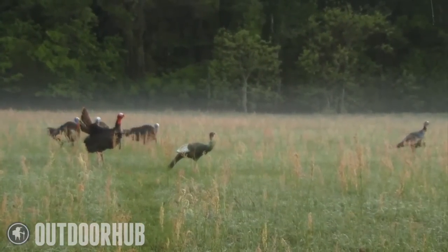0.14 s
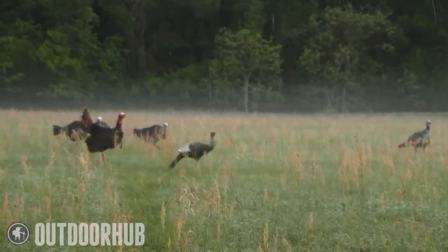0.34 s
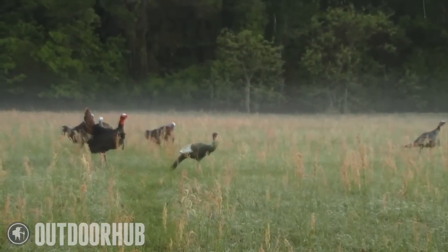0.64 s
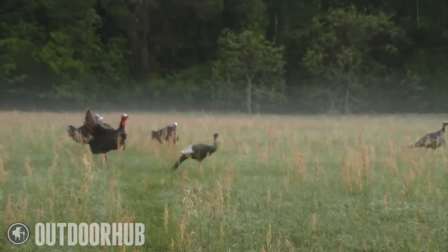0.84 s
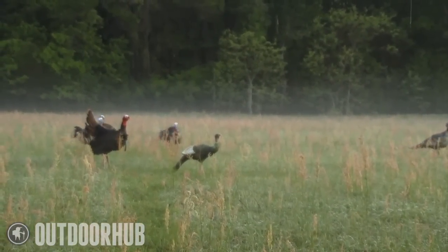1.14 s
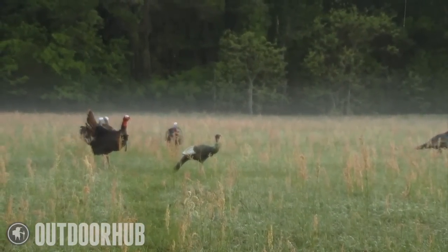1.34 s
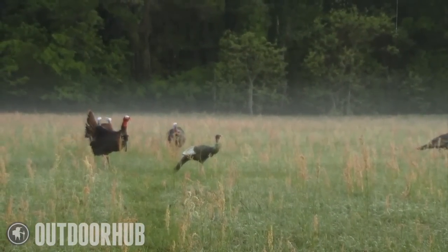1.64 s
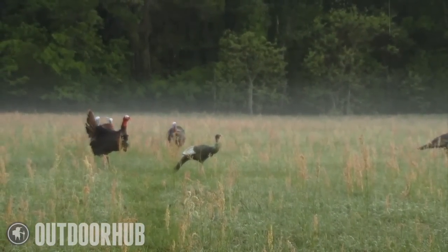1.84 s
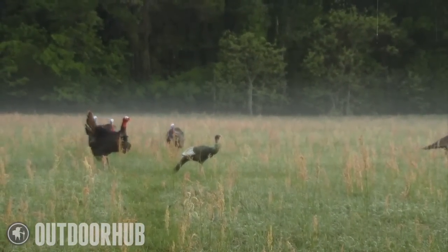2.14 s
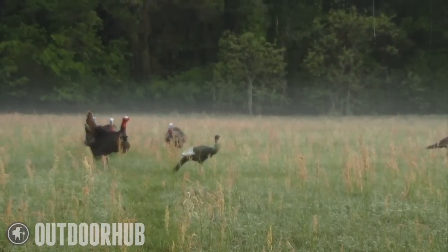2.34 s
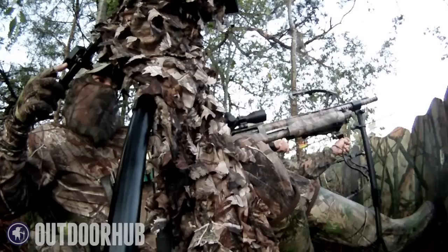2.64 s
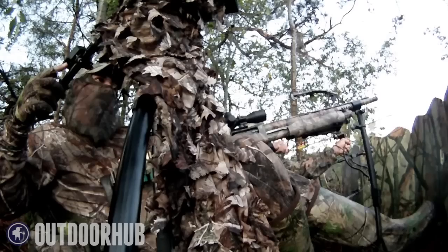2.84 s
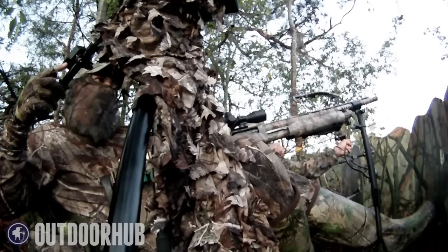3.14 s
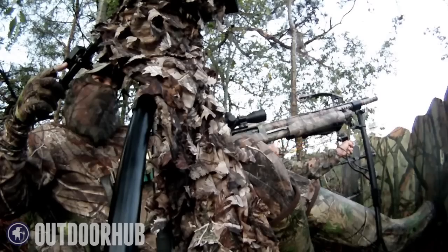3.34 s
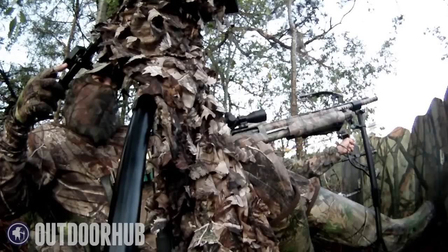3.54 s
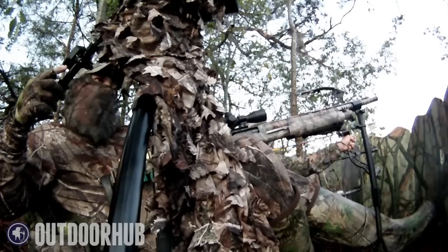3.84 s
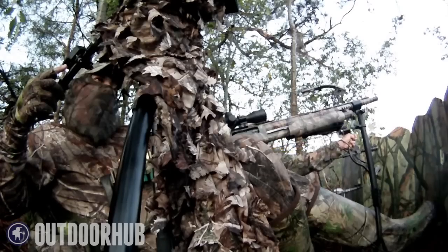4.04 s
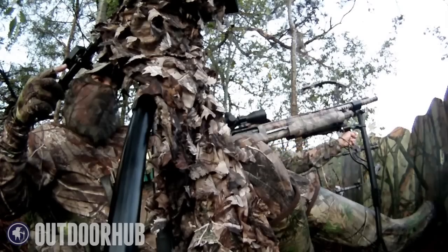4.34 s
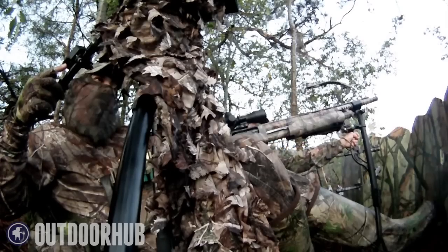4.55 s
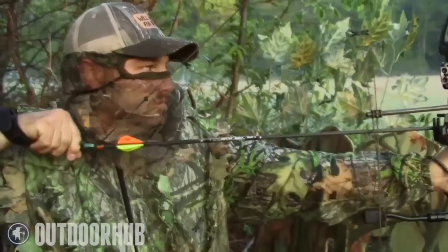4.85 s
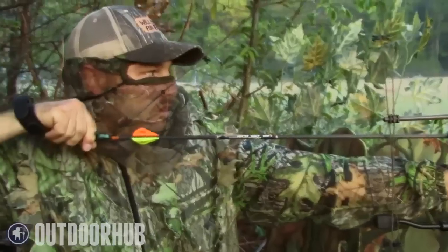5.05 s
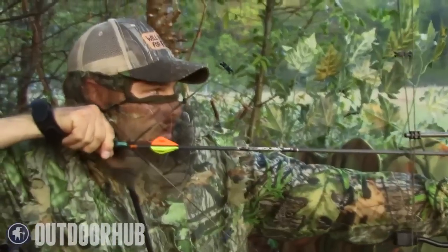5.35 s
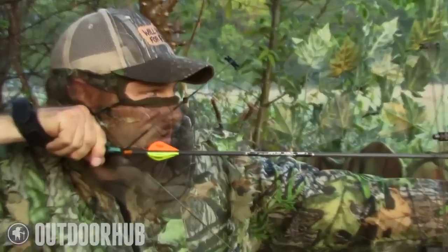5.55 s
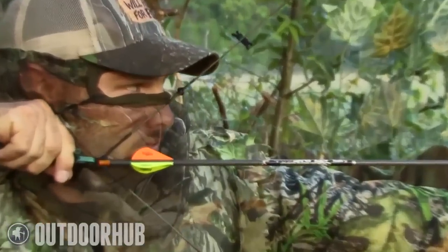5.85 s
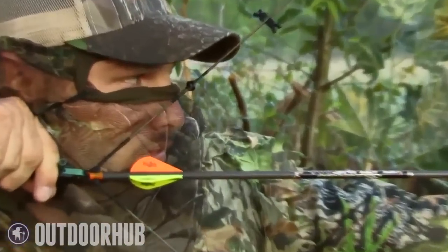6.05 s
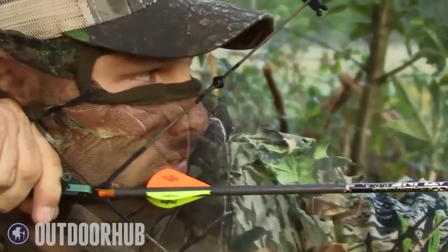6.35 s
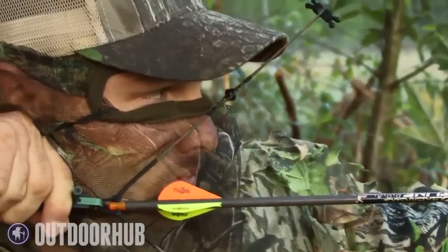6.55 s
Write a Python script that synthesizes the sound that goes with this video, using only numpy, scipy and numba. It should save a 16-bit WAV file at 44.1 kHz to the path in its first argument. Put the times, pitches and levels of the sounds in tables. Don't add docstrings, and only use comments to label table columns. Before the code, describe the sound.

A nearby hen turkey yelps about four times a second, from a soft first call to loud raspy ones, then the same row comes again. After it stops, a quiet meadow remains: soft air, a faint low motor hum, thin bird whistles and chips, a few small knocks, and finally a distant throbbing gobble with a low drone. Close, dry outdoor pickup with faint tree echo.

```python
import sys
import numpy as np
from scipy import signal
from scipy.fft import rfft, irfft
from scipy.io import wavfile
from scipy.ndimage import uniform_filter1d
from numba import njit

SR = 44100
rng = np.random.default_rng(int(sys.argv[2]) if len(sys.argv) > 2 else 0)


def volts_from_decibels(level):
    exponent = np.asarray(level, float) / 20
    return 10 ** exponent


def pcm_store(signal):
    levels = np.round(np.clip(np.atleast_2d(signal), -1, 1) * 32767)
    wavfile.write(sys.argv[1], SR, levels.astype(np.int16).T)


N = 294676
T = np.arange(N) / SR


def unit(x):
    return x / np.sqrt(np.mean(x ** 2))


def curves(rows):
    s, *columns = np.transpose(rows)
    return [np.interp(T, s, c) for c in columns]


def filtered(x, order, hz, kind="low"):
    return signal.sosfilt(signal.butter(order, hz, kind, fs=SR, output="sos"), x)


@njit
def svf(x, hz, width):
    y, band_state, low_state = np.empty(len(x)), 0., 0.
    for i in range(len(x)):
        g, k = np.tan(np.pi * hz[i] / SR), width / hz[i]
        v = (band_state + g * (x[i] - low_state)) / (1 + g * (g + k))
        band_state = 2 * v - band_state
        low_state += 2 * g * v
        y[i] = k * v
    return y


def band(x, hz, width):
    return svf(x + 1e-18, hz + np.zeros(N), 1. * width)


def walk(rate):
    k = int(SR / rate)
    held = np.repeat(rng.standard_normal(N // k + 1), k)
    return unit(uniform_filter1d(uniform_filter1d(held, k), k)[:N])


def tone(hz):
    return np.sin(2 * np.pi * np.cumsum(hz) / SR)


def hen():
    # start_s, length_s, level_db, rasp_pitch_hz, whine_pitch_hz
    yelps = [
        (0.127, .051, -38, 701.3, 850),
        (.362, .086, -26.5, 672.7, 813.7),
        (0.617, 0.083, -25, 685, 826.3),
        (0.871, 0.075, -26.5, 717, 826),
        (1.136, .074, -21.5, 726, 811),
        (1.397, 0.0671, -21.5, 751.8, 839.4),
        (1.741, 0.067, -44.5, 664.4, 699),
    ]
    # centre_hz, width_hz, level_db
    resonances = [(1013, 250, -5.5), (1228, 190, -1), (1590, 238, 3.5), (1986, 570, -8.5), (2790, 143, -6),
                  (3075, 62, -9.5), (3460, 183, -12), (4280, 400, -25.5)]
    flutter_hz = 227.7
    db, hz, root_db, rasp = curves(np.vstack([yelp(*y) for y in yelps]))
    sounding = sum((T > s) & (T < s + length) for s, length, *_ in yelps)
    rasp = np.clip(rasp, 0, 1)
    cycles = np.cumsum(hz * (1 + .06 * rasp * walk(450))) / SR
    flutter = np.cos(2 * np.pi * np.cumsum(flutter_hz * (1 + .45 * walk(110))) / SR)

    uneven = rng.uniform(-1, 1, N // 40)[np.round(cycles).astype(int)]
    size = (1 + .8 * rasp * uneven) * (1 + .6 * rasp * flutter)
    snaps = size * np.exp(6 * (np.cos(2 * np.pi * cycles) - 1))
    turbulence = unit(band(rng.standard_normal(N), 2700, 3000))
    stirred = snaps + .42 * (.3 + rasp) * (1 + .5 * flutter) * turbulence

    voice = sum((-1) ** k * volts_from_decibels(g) * band(band(stirred, f, w), f, 4 * w)
                for k, (f, w, g) in enumerate(resonances))
    voice = filtered(filtered(voice, 6, 960, "high"), 4, 4700)
    voice = voice / np.sqrt(uniform_filter1d(voice ** 2, int(.009 * SR)) + 1e-12)

    root = np.sqrt(2) * tone(hz * (1 + .035 * rasp * walk(150)))
    root = root * (1 + .35 * rasp * flutter) * volts_from_decibels(2.5 * rasp * walk(120))
    root = filtered(root, 4, 480, "high")
    root_level = volts_from_decibels(root_db) * np.clip((db + 60.5) / 12, 0, 1)

    breath = (3.9 + np.cos(2 * np.pi * cycles)) * rng.standard_normal(N)
    hiss = unit(band(band(breath, 8700, 4600), 9630, 4400))
    hiss = hiss + volts_from_decibels(-16.0) * unit(band(breath, 13200, 1500))
    hiss = hiss + volts_from_decibels(-11.0) * unit(band(breath, 5940, 300))
    return sounding * volts_from_decibels(db) * (voice + volts_from_decibels(-33.5) * rasp * hiss + root_level * root)


def yelp(s, length, db, hz, edge_hz):
    rasp = np.clip((db + 44) / 19, 0, 1)
    end = s + length
    whine, crack, close, release = np.minimum([.015, 0.01273, 0.01293, .016], .22 * length)
    root_db = -6.5 - 1.16 * max(db + 27, 0)
    sag_db = min(-300 * (length - 0.076), 3)
    crack_hz = edge_hz + 0.3575 * (hz - edge_hz)
    return np.transpose([[s, s + whine, s + whine + crack, end - release - close, end - release, end],
                         db + np.array([-36.5, -6.5, 0, sag_db, sag_db - 3, -44]),
                         [1.03 * edge_hz, crack_hz, hz, hz, edge_hz, 0.98 * edge_hz],
                         root_db + np.array([1, 1, 0, 0, 3.5, 3.5]),
                         rasp * np.array([.5, .5, .75, 1, .5, .5])])


def songbirds():
    out, warble = np.zeros(N), walk(250)
    for s, length, first_hz, last_hz, db, bend in notes():
        u = np.linspace(0, 1, int(length * SR))
        i = int(s * SR)
        hz = first_hz + (last_hz - first_hz) * u ** bend
        depth = .5 * abs(last_hz / first_hz - 1)
        hz = hz * (1 + depth * warble[max(i, 0):][:len(u)] / 10)
        note = volts_from_decibels(db - 1.5) * np.sin(np.pi * u) ** .5 * tone(hz)
        out[max(i, 0):i + len(u)] += note[max(-i, 0):]
    return out * volts_from_decibels(1.5 * walk(90))


def notes():
    # start_s within it, length_s, first_hz, last_hz, level_db
    phrase = [
        (0, .014, 3600, 5120, -56.5),
        (.007, 0.019, 5330, 5180, -47),
        (0.067, 0.01, 4280, 3280, -51.5),
        (0.304, .017, 3340, 3090, -56),
        (0.427, .04, 2270, 1753, -58.5),
        (0.471, .04, 1800, 2000, -60.5),
        (0.553, .037, 2820, 4565, -50),
        (0.601, .075, 5960, 2710, -55.5),
        (0.67, .06, 2730, 2740, -64),
    ]
    # start_s, stretch, louder_db
    sung = [
        (.022, 1.0, 0),
        (5.814, 1.016, 0),
    ]
    # start_s, length_s, level_db
    whistles = [
        (-.12, .215, -62.5),
        (1.829, 0.17, -70),
        (4.499, 0.049, -62),
        (4.723, .2, -61.5),
        (4.973, 0.17, -62.5),
    ]
    # start_s, length_s, first_hz, level_db
    chips = [(.197, 0.028, 4330, -68), (.33, .036, 4300, -75), (4.551, .025, 4370, -72),
             (4.683, .025, 4280, -68), (5.223, .021, 4350, -65), (5.23, 0.0093, 6400, -58.5),
             (5.51, 0.049, 2980, -59), (5.547, 0.053, 3830, -64), (5.58, 0.04, 4330, -65),
             (5.642, .017, 4130, -63), (5.941, 0.011, 3660, -57), (6.05, 0.016, 4480, -61),
             (6.417, 0.047, 5170, -60)]
    # start_s,
    # length_s, first_hz, last_hz, level_db
    other_slides = [(.24, .038, 1790, 2070, -64), (4.592, .04, 2990, 3120, -69),
                    (4.83, .05, 2630, 3280, -69), (5.076, .04, 2900, 3100, -69),
                    (5.2, .018, 5270, 6300, -68), (5.656, .04, 3690, 3810, -61),
                    (5.693, .04, 4000, 4250, -66), (5.8, .13, 1150, 1257, -69),
                    (5.949, .076, 1300, 1390, -61.5), (6.141, .094, 3210, 2430, -59),
                    (6.306, .034, 3180, 3370, -64.5)]
    glides = [(at + s * stretch, *note, db + near_db)
              for at, stretch, near_db in sung for s, *note, db in phrase]
    glides = glides + other_slides
    glides = glides + [(s, length, hz, .87 * hz, db) for s, length, hz, db in chips]
    bent = [(*n, 0.33 if n[3] < n[2] and n[1] > .05 else 1) for n in glides]
    return bent + [(s, length, 2210, 2426, db, 0.394) for s, length, db in whistles]


def ticks():
    # start_s, peak_db, ring_hz, t60_s
    knocks = [(1.122, -35, 233.5, 0.038), (4.284, -49.5, 1784, 0.045), (4.93, -53.5, 9170, 0.0034),
              (5.159, -53.5, 253, 0.1), (5.33, -40, 530, .02), (5.333, -46.5, 4500, 0.0034),
              (5.4, -55, 5560, .006), (5.449, -53.5, 349, 0.074), (5.67, -37.5, 740, 0.0063),
              (5.67, -39, 150, 0.038), (6.666, -55, 1720, 0.041), (6.669, -55, 3760, .02)]
    out = np.zeros(N)
    for s, db, hz, t60 in knocks:
        i = int(s * SR)
        t = np.arange(min(int(t60 * SR), N - i)) / SR
        out[i:i + len(t)] += volts_from_decibels(db) * np.exp(-np.log(1000) * t / t60) * np.sin(2 * np.pi * hz * t)
    return filtered(out, 2, 130, "high")


def woods(x, t60, hz):
    t = np.arange(SR // 2) / SR
    tail = rng.standard_normal(len(t)) * np.exp(-np.log(1000) * t / t60) * np.clip(t * 100, 0, 1)
    tail = filtered(tail, 2, hz)
    return signal.fftconvolve(x, tail / np.sqrt(np.sum(tail ** 2)))[:N]


def splice(x):
    in_s, out_s, dissolve_s, lag_samples = 1.8, 3.65, 0.59, 83874
    again = np.clip(np.minimum((T - in_s) / dissolve_s, (out_s - T) * 20), 0, 1) ** 2
    return np.sqrt(1 - again) * x + np.sqrt(again) * np.roll(x, lag_samples)


def tom():
    # start_s, held_s, level_db, resonance_hz
    syllables = [
        (5.814, .01, -75, 1160),
        (6.06, .04, -61, 1700),
        (6.18, 0.053, -56.5, 1720),
        (6.24, 0.032, -60.5, 1520),
        (6.318, .01, -74, 1870),
        (6.39, 0.061, -61.5, 1097),
        (6.584, .01, -67, 1590),
    ]
    # start_s, pitch_hz, level_db
    drone = [(6.2, 172, -57), (6.26, 147.5, -54), (6.32, 114, -64), (6.45, 111.8, -58), (6.68, 110, -59)]
    swell_db_s, fade_db_s = 307, 328
    db = np.max([g - np.maximum(swell_db_s * (s - T), fade_db_s * (T - s - held)).clip(0)
                 for s, held, g, _ in syllables], axis=0)
    hz = curves(syllables)[2]
    throb = volts_from_decibels(2.5 * walk(45)) * rng.standard_normal(N)
    gobble = unit(band(band(throb, hz, 525), hz, 636)) * volts_from_decibels(db)
    drone_hz, drone_db = curves(drone)
    return gobble + np.sqrt(2) * volts_from_decibels(drone_db) * (T > drone[0][0]) * tone(drone_hz)


def motor():
    # start_s, level_db
    hum_levels = [(0.0, -50), (0.02, -52), (1.3, -51), (4.41, -51), (4.84, -53), (5.28, -50.5),
                  (5.49, -53.5), (6.68, -52.5)]
    hum = volts_from_decibels(curves(hum_levels)[0]) * tone(149.7 + .5 * walk(4.9))
    whine = volts_from_decibels(-71 + 1.9 * walk(12.0)) * tone(210.3 + 1.37 * walk(7.9))
    return np.sqrt(2) * (hum + whine)


def air():
    # frequency_hz, level_db
    colour = [(20, -44), (60, -34.5), (120, -26.5), (300, -31.5), (550, -30), (2400, -37), (4500, -42),
              (15000, -47.5)]
    # start_s, strength_db
    gusts = [(0, -0.5), (.61, 0.5), (.99, 1.5), (1.39, 7), (1.56, 6), (1.82, -4), (2.12, -7), (2.49, 1),
             (2.86, 0.5), (3.31, 7.5), (3.44, 7.5), (3.81, -1), (4.28, 0.5), (4.76, -2), (6.25, 1.5),
             (6.68, -1.5)]
    f = np.arange(N // 2 + 1) * SR / N + 1
    hz, db = np.transpose(colour)
    hush = rfft(splice(rng.standard_normal(N))) * volts_from_decibels(np.interp(np.log(f), np.log(hz), db))
    deep = 1 / (1 + (f / 110) ** 4)
    low = 1 / (1 + (f / 1200) ** 4) - deep
    high = 1 / (1 + (5500 / f) ** 4)
    middle = 1 - deep - low - high
    out = unit(irfft(hush * deep, N)) * volts_from_decibels(-75.5 + 1.1 * walk(2.5) + 3.2 * np.clip(T - 4, 0, 3))
    chorus = sum(lift_db * np.exp(-((T - s) / 0.55) ** 2)
                 for s, lift_db in ((0.58, 4.5), (2.58, 4), (6.83, 2.5)))
    breeze = curves(gusts)[0]
    for share, level_db, follows, lift in ((low, -64, 0.59, 0), (middle, -69.5, 0.28, chorus),
                                           (high, -74, 0.49, 0)):
        out = out + unit(irfft(hush * share, N)) * volts_from_decibels(level_db + follows * breeze + lift)
    return out


def scene():
    near, birds = hen(), songbirds()
    meadow = near + volts_from_decibels(-35.5) * woods(near, 0.24, 4200) + volts_from_decibels(-12.5) * woods(near, 0.019, 3930)
    meadow = meadow + birds + volts_from_decibels(-7.5) * woods(birds, 0.74, 11000) + volts_from_decibels(-8.0) * woods(birds, 0.042, 14000)
    meadow = meadow + ticks()
    return (splice(meadow) + tom() + motor() + air())[None]


def top_cut(x):
    return signal.sosfilt(signal.butter(12, 15640, fs=SR, output="sos"), x)


def record(dry):
    dull = filtered(dry, 12, 15000)
    return top_cut(dull)


dry = scene()
out = record(dry)
pcm_store(out)
```